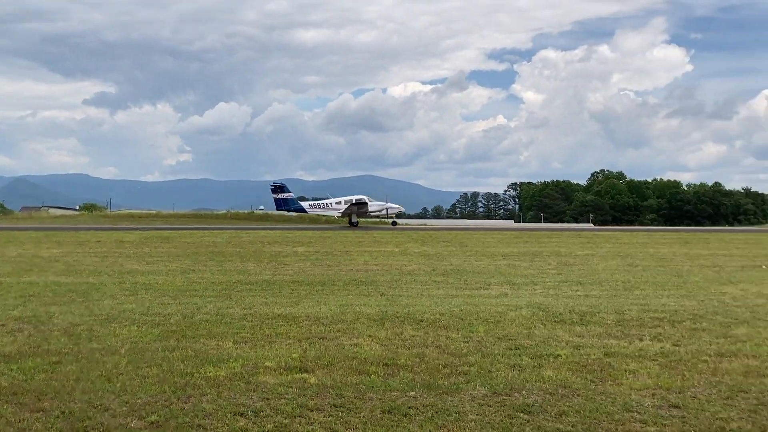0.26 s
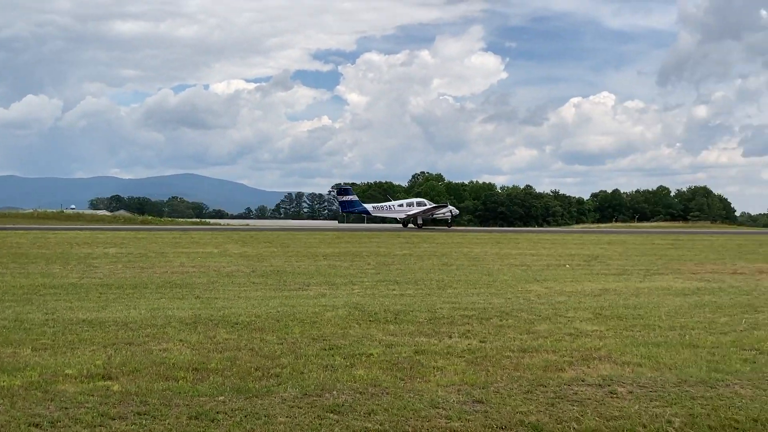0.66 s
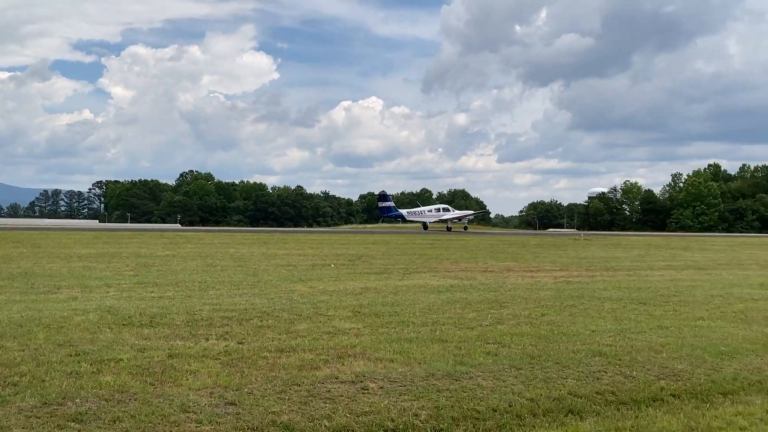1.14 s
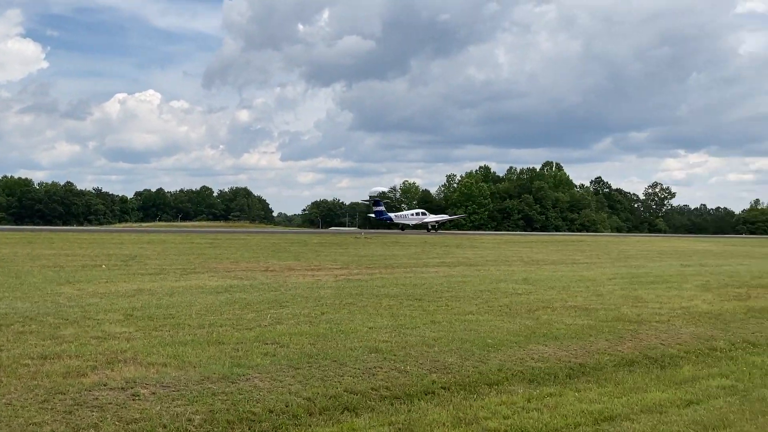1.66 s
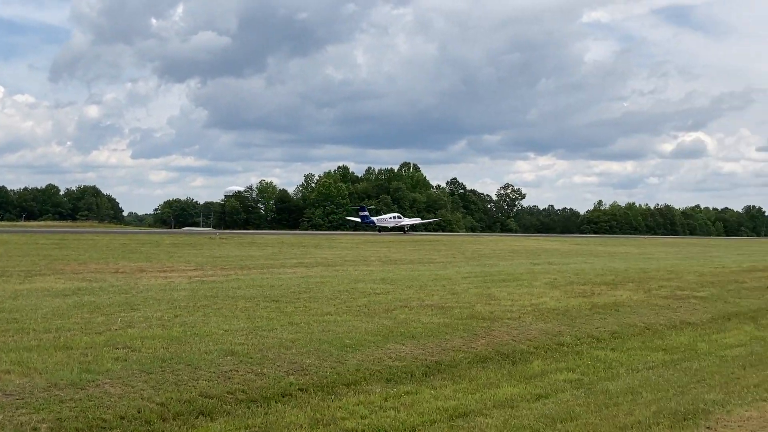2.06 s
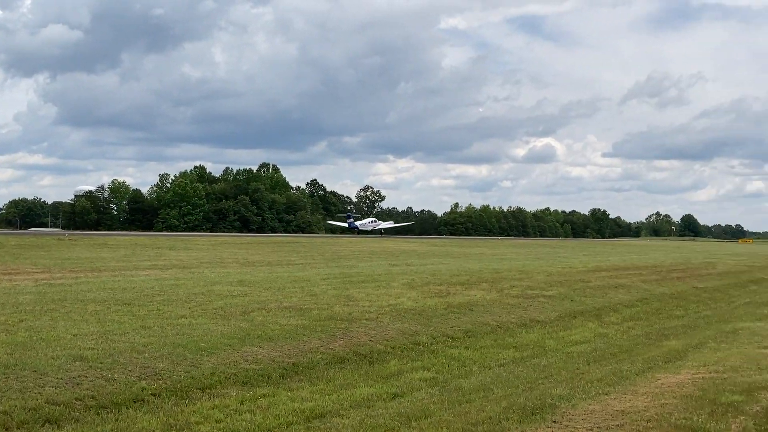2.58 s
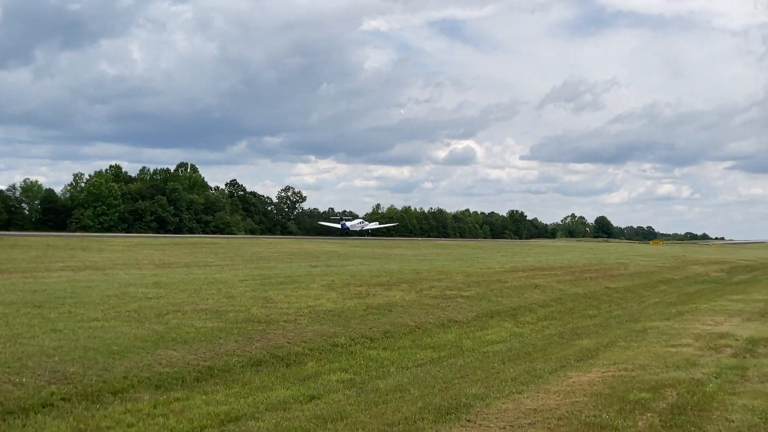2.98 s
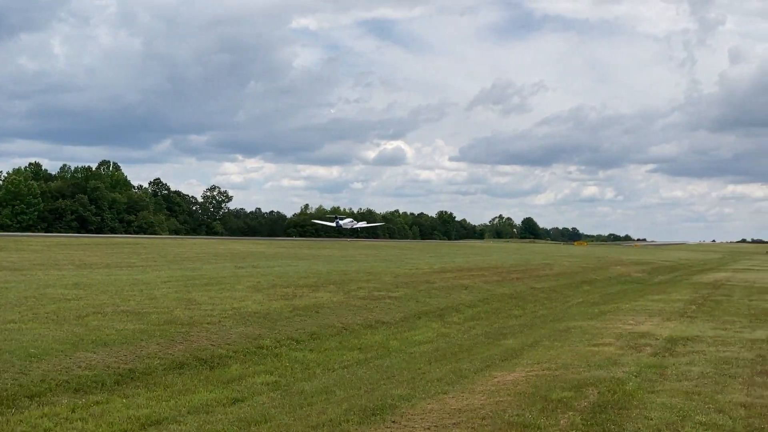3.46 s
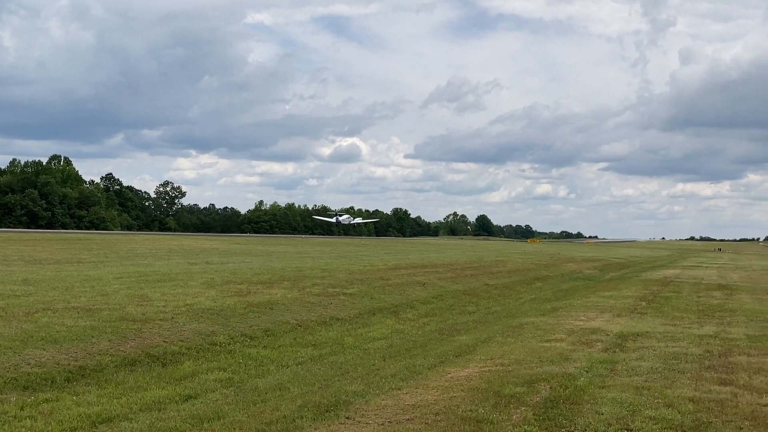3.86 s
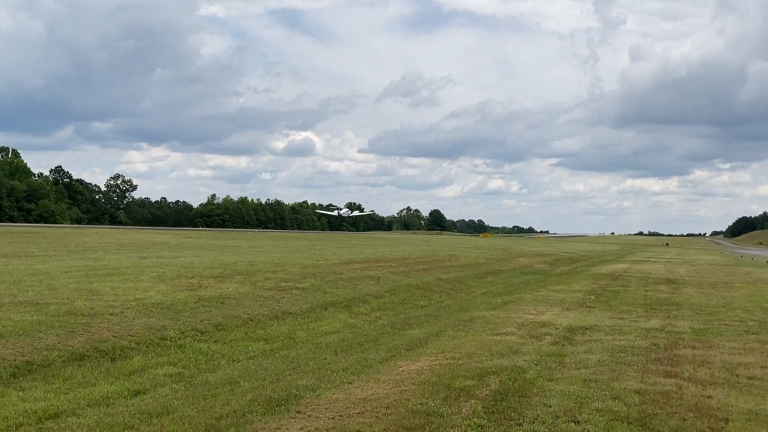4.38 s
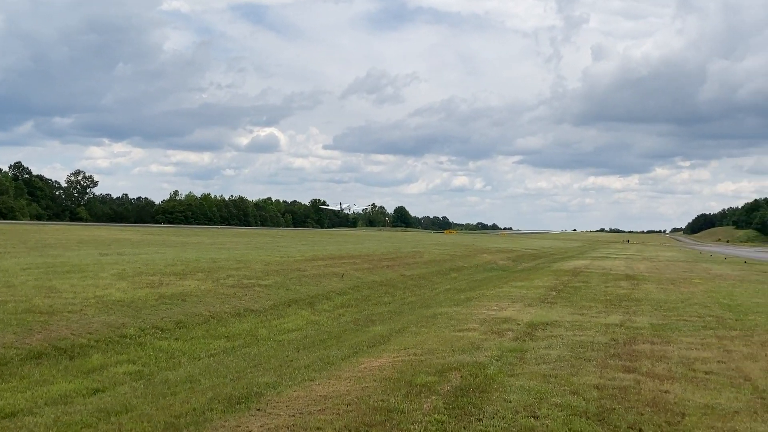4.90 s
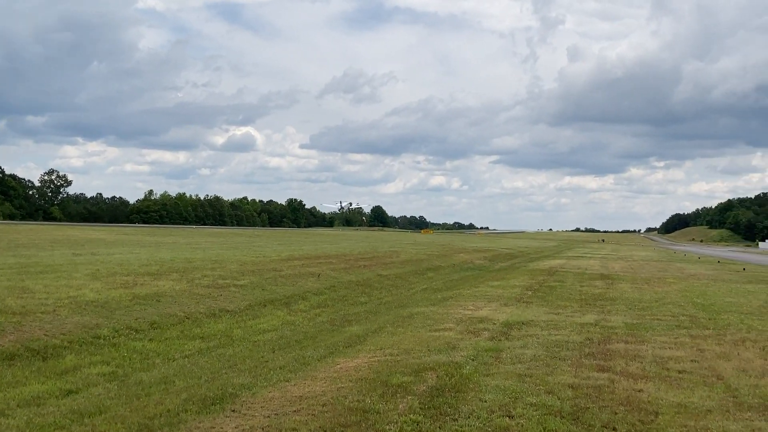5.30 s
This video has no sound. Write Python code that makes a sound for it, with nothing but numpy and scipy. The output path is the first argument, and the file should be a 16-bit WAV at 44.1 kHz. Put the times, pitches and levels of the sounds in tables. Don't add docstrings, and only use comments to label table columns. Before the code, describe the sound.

A light twin-engine propeller plane takes off across a grass airfield. It starts immediately loud, a deep drone with rough, crackling exhaust rasp. Within two seconds the rasp dulls and drops away, the pitch sagging slightly, leaving a low hum that swells and dips. Faint breeze and tiny dry grass ticks surround the end. Outdoor stereo from a small camera microphone at a fixed spot beside the field.

```python
import sys
import numpy as np
from scipy import signal
from scipy.io import wavfile
from scipy.ndimage import uniform_filter1d

SR = 44100
rng = np.random.default_rng(int(sys.argv[2]) if len(sys.argv) > 2 else 0)


def level_to_linear(level):
    exponent = np.asarray(level, float) / 20
    return 10 ** exponent


def generate_wav(signal):
    frames = np.transpose(np.atleast_2d(signal))
    scaled = np.clip(frames, -1, 1) * 32767
    pcm = np.round(scaled).astype(np.int16)
    wavfile.write(sys.argv[1], SR, pcm)


N = 244314

# pitch_hz, density_db_per_hz
FIELD_COLOUR = [(20, -1), (45, 3), (125, -21), (400, 4.5), (1200, 4), (2000, 3), (3200, 0), (5500, -7.5),
                (8000, -9), (9800, -8), (10600, -70.5), (16000, -82)]
# time_s, level_db
BREEZE = [
    (3.3, -60.5),
    (3.9, -55),
    (4.5, -55.5),
    (5.05, -58),
    (5.54, -60.5),
]
# start_s, level_db
GRASS_TICKS = [
    (2.6549, -51),
    (3.4227, -49),
    (3.8162, -54),
    (4.488, -60),
]
# pitch_hz, coherence_0_to_1
FIELD_COHERENCE = [(60, .9), (300, .9), (700, .2), (1300, .15), (2000, .6), (3000, .75), (6000, .8),
                   (7000, .96), (8000, .85), (8800, .995), (16000, .995)]
# pitch_hz,
# coherence_0_to_1
RASP_COHERENCE = [(100, .97), (800, .8), (1800, .97), (2800, .74), (4100, .93), (5300, .55), (7000, .96),
                  (7900, .6), (8800, .97), (9500, .97), (10200, .85), (10800, .985), (12100, .98),
                  (12650, .4), (13200, .93), (14200, .9), (14750, .35), (15300, .98)]
# pitch_hz, left_lead_rad, left_minus_right_db
PORTS = [(200, 1., 1.), (770, .6, -.5), (1250, .6, 1.5), (1800, .0, 1.), (2900, 1.1, 1.3), (3950, .15, -.4),
         (4800, .4, -.6), (5600, 2., -1.), (7000, .05, -.8), (8700, -3.05, .0), (9650, -3.2, .0),
         (10600, -6.2, .0), (12100, -6.35, .0), (13000, -9.35, .0), (14300, -9.5, .0), (15000, -12.55, .0)]
# pitch_hz, density_db_per_hz
RUMBLE_COLOUR = [(20, -22), (40, -8.), (70, -12.5), (130, 10), (210, 3.5), (300, -16.5), (600, -31),
                 (1000, -44)]
# time_s, level_db, edge_db, burst_depth_db
RASP = [(0.0, -24, -2.5, 4.5), (0.1, -22.5, -2.5, 5), (0.56, -22.5, -1.5, 4), (0.63, -22.5, -0.5, 6),
        (0.8, -24.5, -0.5, 5.5), (0.98, -21.5, -2, 12), (1.27, -26.5, 1, 7), (1.39, -29, -1.5, 11.5),
        (1.55, -28.5, -1, 8.5), (1.83, -37, -0.5, 6.5), (1.92, -35.5, 1, 6.5), (2.12, -39.5, -1.5, 2),
        (2.64, -44, -0.5, 2.5), (2.86, -44.5, -1, 5.5), (3.2, -53.5, 0.5, 1), (3.75, -59, 0, 6.5),
        (4.0, -66, -5.5, 3), (5.54, -63, -8, 15)]
# pitch_hz, density_db_per_hz
RASP_COLOUR = [(60, -21), (300, -21.5), (500, -8), (900, -13), (1150, -1.5), (1550, -5.5), (1900, -1),
               (3200, -5), (5500, -11), (8000, -7), (10500, -14), (13500, -25.5), (15700, -27),
               (16100, -62)]
STROKES_DB = [2.6, .2, -1., -1.4]
# middle_s, half_length_s, gain_db
CRACKLES = [(0.008, 0.087, 3.5), (0.181, 0.058, 5.5), (0.282, 0.032, 4), (0.399, 0.0062, 3),
            (0.662, 0.035, 3), (0.928, 0.13, 4.5), (1.098, 0.034, 1.5), (1.456, 0.063, 5.5),
            (1.616, .02, 3.5), (1.762, 0.033, 4.5), (1.884, 0.014, 4), (1.961, 0.018, 3), (2.27, 0.024, 4),
            (2.333, 0.051, 3.5), (2.538, 0.034, 3), (2.85, .03, 1.5)]
# time_s, pitch_hz
BLADES = [(0, 90), (.35, 87.96), (.7, 86.27), (1.05, 84.46), (1.4, 83.44), (1.75, 81.8), (2.1, 81.14),
          (2.45, 81.23), (2.8, 80.06), (3.2, 80.75), (3.85, 80.87), (4.2, 80.86), (4.55, 80.2),
          (4.9, 80.13), (5.54, 79.74)]
# time_s, lag_blade_turns
TWIN_LAG = [
    (0, .01),
    (.32, .31),
    (.48, .425),
    (.62, .5),
    (.8, .585),
    (1.6, .604),
    (4.2, .57),
    (5.54, .578),
]
# time_s, first_order_lead_rad, upper_order_lead_rad
BEARING = [(0, .08, -0.96), (1.3, .16, -0.95), (1.8, .19, -.75), (2.3, .21, 0.073), (2.8, .26, 0.32),
           (4, .31, 0.46), (5.54, .35, 0.26)]
# time_s, first_order_db, second_order_db
DRONE = [(0, -11.5, -17), (.28, -12, -18), (.45, -18.5, -13.5), (.7, -21.5, -14), (.95, -13.5, -17),
         (1.35, -12.5, -21.5), (1.8, -16, -21), (2.2, -14.5, -29.5), (2.35, -17.5, -28), (2.9, -20, -30),
         (3.4, -22.5, -31.5), (3.7, -19, -30.5), (4.05, -19.5, -24), (4.35, -19.5, -31), (4.7, -19.5, -29),
         (5.0, -28, -38), (5.54, -27, -36.5)]
# middle_s, depth_db, half_width_s
FIRST_FADES = [(.65, -7.5, .25), (.94, -6, 0.13), (1.23, -5.5, 0.11), (1.51, -7.5, 0.062),
               (1.76, -2.5, 0.07), (2.05, -5.5, 0.12), (3.27, -2, 0.061), (3.52, -31, 0.06),
               (3.82, -28, 0.19), (4.21, -7.5, 0.078), (4.57, -4.5, 0.15), (4.87, -10.5, 0.1),
               (5.18, -5, 0.062), (5.45, -15, .05)]
SECOND_FADES = [(.25, -12, 0.05), (1.02, -14.5, 0.017), (1.17, -11.5, 0.12), (2.02, -8, 0.023),
                (2.14, -23, 0.028), (2.24, -8.5, 0.062), (3.27, -9, 0.054), (3.41, -13.5, 0.043),
                (3.75, -23, 0.054), (3.95, -27, 0.049), (4.15, -26, 0.098), (4.46, -30, 0.062),
                (4.72, -23, 0.059), (4.98, -18, .12)]
# blade_order, level_db
UPPER = [(3, -3), (4, -5), (5, -5), (6, 0), (7, 2.9), (8, 2.5), (9, -4.5), (10, -35)]
# blade_order, level_db relative to the mean drone
QUARTERS = [(0.498, -42), (0.751, -33), (1.248, -32), (1.5, -32.5), (1.75, -32.5), (2.251, -36),
            (2.5, -35.5), (2.75, -37), (3.5, -43.5)]

NEAREST_S, PASS_S = 0.46, 0.55
LEAVES_DB, FRESHEN_DB, LEAVES_RISE_S = -2.5, 4.5, 4.63
RUMBLE_DB, RUMBLE_SPREAD = -46.5, 0.32
BODY_DB, BODY_SPREAD = 2, 0.67
PRESENCE_DB = -0.5
TREBLE_DB, TREBLE_SPREAD = -1.5, 0.39
TOP_GONE_S, TOP_GONE_DB = 3.75, -25
THIRD_DB, THIRD_SPREAD = -26.5, 1.274
ORDER_LOSS_DB, ORDER_LOSS_S = 5.5, 1.4
CEILING = 1.7


def evened(x):
    return x / np.sqrt(np.mean(x ** 2) + 1e-20)


def curves(rows, t):
    s, *columns = np.transpose(rows)
    return [np.interp(t, s, c) for c in columns]


def read(points, hz, column=1):
    points = np.transpose(points)
    return np.interp(np.log(hz + 1), np.log(points[0] + 1), points[column])


def drift(count, seconds):
    knots = rng.standard_normal((count, int(N / SR / seconds) + 2))
    slow = evened(signal.resample(knots, N // 64 + 1, axis=1))
    return slow.repeat(64, axis=1)[:, :N]


def spreading_db(t):
    return 10 * np.log10(1 + ((t - NEAREST_S) / PASS_S) ** 2)


def coloured(pair, coherence, shape_db, patchy_db):
    hz, t, (a, b) = signal.stft(pair, SR, nperseg=512, noverlap=384)
    patches = uniform_filter1d(rng.standard_normal(a.shape), 6, axis=0)
    patches = evened(uniform_filter1d(patches, 14, axis=1))
    alike = np.clip(read(coherence, hz), 0, 1)[:, None]
    port = np.exp(.5j * read(PORTS, hz)) * level_to_linear(.5 * read(PORTS, hz, column=2))
    port = port[:, None]
    left = a * port
    right = (alike * a + np.sqrt(1 - alike ** 2) * b) / port
    gain = level_to_linear(shape_db(hz[:, None], t) + patchy_db * patches)
    return signal.istft(np.array([left, right]) * gain, SR, nperseg=512, noverlap=384)[1][:, :N]


def field():
    def shape_db(hz, s):
        leaves_db = LEAVES_DB + FRESHEN_DB * np.clip((s - LEAVES_RISE_S) / 0.25, 0, 1)
        leaf_band = np.clip(np.log2((hz + 1) / 2500), 0, 1)
        return read(FIELD_COLOUR, hz) + curves(BREEZE, s)[0] + leaves_db * leaf_band

    air = rng.standard_normal((2, N))
    out = level_to_linear(12.0) * coloured(air, FIELD_COHERENCE, shape_db, patchy_db=2.5)
    u = np.arange(90) / SR
    tick = np.exp(-u / .0005) * np.sin(2 * np.pi * 14500 * u)
    for s, db in GRASS_TICKS:
        out[:, round(s * SR):][:, :90] += level_to_linear([[db + 12.0], [db - 10.0]]) * tick
    return out


def slipstream():
    def shape_db(hz, s):
        return read(RUMBLE_COLOUR, hz) + RUMBLE_DB - RUMBLE_SPREAD * spreading_db(s)

    wake = rng.standard_normal((2, N))
    return level_to_linear(23.5) * coloured(wake, FIELD_COHERENCE, shape_db, patchy_db=2.5)


def crackle_db(t):
    return sum(db * np.exp(-((t - s) / half) ** 2) for s, half, db in CRACKLES)


def rasp_shape_db(hz, s):
    level, edge, _ = curves(RASP, s)
    edge = edge + 0.35 * crackle_db(s)
    loss_db = spreading_db(s)
    octave = np.log2((hz + 1) / 2000)
    low = np.clip(-octave / 1.42, 0, 1)
    middle = np.clip(1 - abs(octave - 1.15) / 0.77, 0, 1)
    high = np.clip((octave - 1.15) / 0.63, 0, 1) + .5 * np.clip(octave - 2.1, 0, 1)
    body_db = BODY_DB - 2.0 + 0.12 * edge + BODY_SPREAD * loss_db
    presence_db = PRESENCE_DB + 3.3 * edge
    treble_db = TREBLE_DB + 2.25 * edge - TREBLE_SPREAD * loss_db
    gone_db = TOP_GONE_DB * np.clip((s - TOP_GONE_S) / .25, 0, 1) * np.clip((hz - 10300) / 700, 0, 1)
    tilt_db = body_db * low + presence_db * middle + treble_db * high
    return read(RASP_COLOUR, hz) + level + gone_db + tilt_db


def exhaust(t, turns):
    place = turns + 0.756
    stroke = place.astype(int)
    u = place % 1
    depth_db = curves(RASP, t)[-1] + 1.37 + 0.5 * crackle_db(t)
    chance = np.tanh(rng.standard_normal((stroke[-1] + 1, 2)))[stroke].T
    size_db = np.array(STROKES_DB)[stroke % 4] + 1.0 * chance[0]
    burst = level_to_linear(depth_db + size_db) * u / 0.18 * np.exp(1 - u / 0.17) * (1 - u ** 4)
    crack_db = depth_db + 1.54 * size_db + 3.5 * chance[1] + 2.4
    crack = level_to_linear(crack_db) * u / 0.1 * np.exp(1 - u / 0.068)
    hiss, spit, snap = rng.standard_normal((3, 2, N))
    spit = signal.sosfilt(signal.butter(1, 1100., "high", fs=SR, output="sos"), burst * spit)
    snap = signal.sosfilt(signal.butter(2, 5000., "high", fs=SR, output="sos"), crack * snap)
    jet = (hiss + spit + snap) / np.sqrt(1 + uniform_filter1d(burst ** 2, SR // 8, mode="nearest"))
    return level_to_linear(13.5) * coloured(jet, RASP_COHERENCE, rasp_shape_db, patchy_db=1.43)


def tone(db, angle, lead):
    return np.sqrt(2) * level_to_linear(db) * np.cos([angle + lead / 2, angle - lead / 2])


def fading_db(fades, t):
    s, depth_db, width = np.transpose(fades)[:, :, None]
    u = ((t[::64] - s) / width) ** 2
    null_db = 10 * np.log10((u + level_to_linear(2 * depth_db)) / (u + 1))
    return np.interp(t, t[::64], null_db.sum(axis=0))


def propellers(t, turns):
    angle = 2 * np.pi * (turns + .2)
    lead_first, lead = curves(BEARING, t)
    first_db, second_db = curves(DRONE, t)
    lag = curves(TWIN_LAG, t)[0]
    first_db = first_db + fading_db(FIRST_FADES, t)
    second_db = second_db + fading_db(SECOND_FADES, t)
    out = tone(first_db, angle, lead_first)
    out += tone(second_db, 2 * angle + 1.0 - 2.85 * np.pi * lag, lead)

    third_db = THIRD_DB - THIRD_SPREAD * spreading_db(t)
    loss_db = ORDER_LOSS_DB * np.tanh(t / ORDER_LOSS_S)
    gusts = uniform_filter1d(drift(count=len(UPPER) + len(QUARTERS), seconds=0.11), size=64)
    for (order, db), gust in zip(UPPER, gusts):
        pair = (1 + .8 * np.exp(2j * np.pi * order * lag)) / 2
        start = rng.uniform(0, 2 * np.pi)
        wave = order * (angle - np.pi * lag) + np.angle(pair) + start + 0.029 * gust
        order_db = third_db + db - (order - 3) * loss_db + 1.4 * gust
        out += abs(pair) * tone(order_db, wave, -.7 * lead if order > 3 else lead)

    mean_db = uniform_filter1d(np.maximum(first_db, second_db), SR // 2, mode="nearest")
    lumps = np.zeros(N)
    for (order, db), gust in zip(QUARTERS, gusts[::-1]):
        start = rng.uniform(0, 2 * np.pi)
        lumps += level_to_linear(db + 4.2 * gust) * np.cos(order * angle + start + 1.46 * gust)
    return out + np.sqrt(2) * level_to_linear(mean_db) * lumps


def scene():
    t = np.arange(N) / SR
    turns = np.cumsum(curves(BLADES, t)[0]) / SR
    return field() + slipstream() + exhaust(t, turns) + propellers(t, turns)


def low_pass(x):
    return signal.sosfilt(signal.butter(12, 15850, fs=SR, output="sos"), x)


def record(dry):
    mix = CEILING * np.tanh(dry / CEILING)
    return low_pass(mix)


dry = scene()
out = record(dry)
generate_wav(out)
```